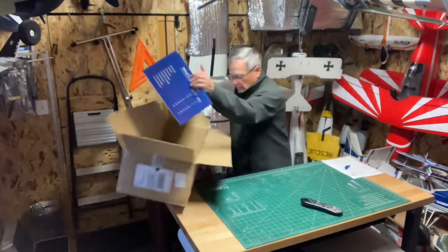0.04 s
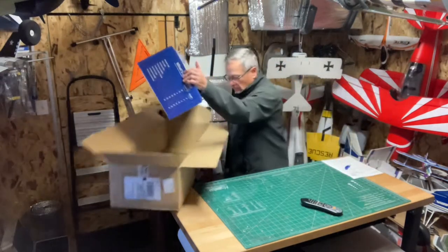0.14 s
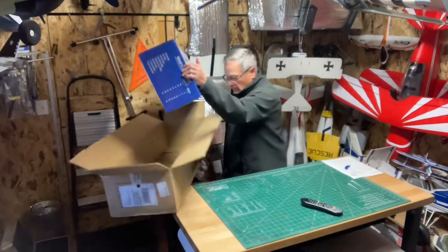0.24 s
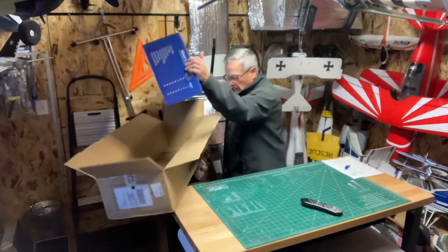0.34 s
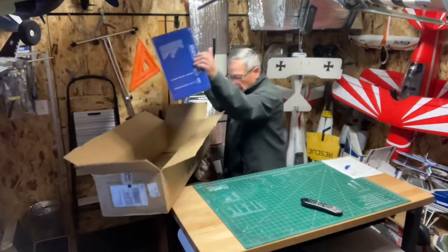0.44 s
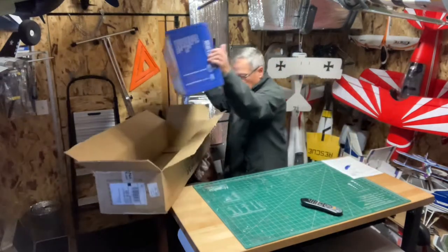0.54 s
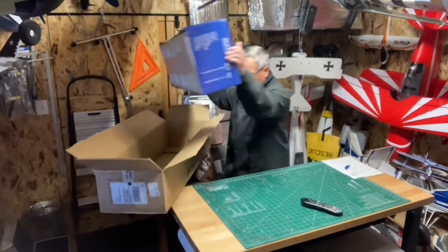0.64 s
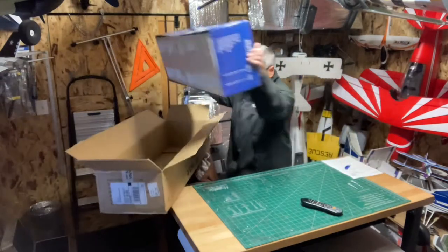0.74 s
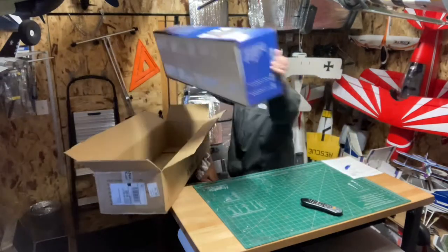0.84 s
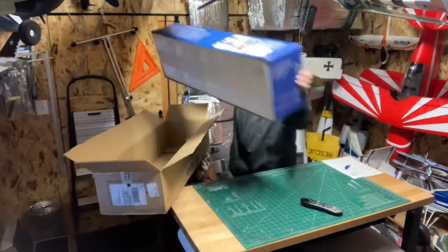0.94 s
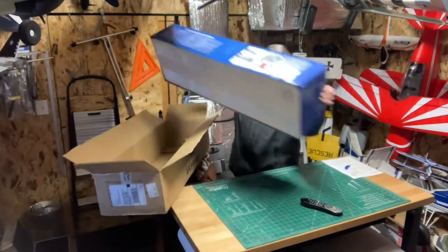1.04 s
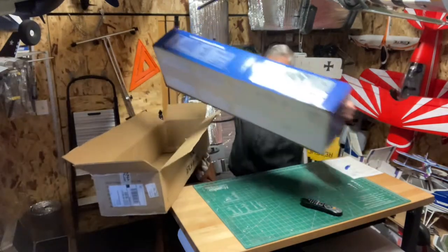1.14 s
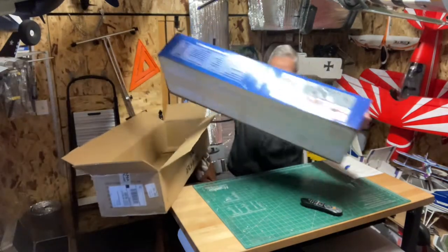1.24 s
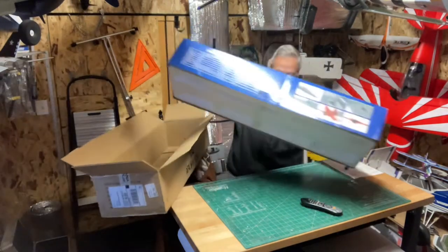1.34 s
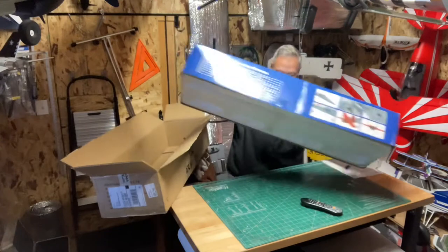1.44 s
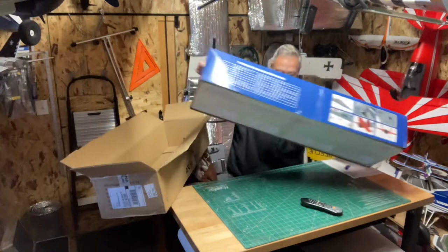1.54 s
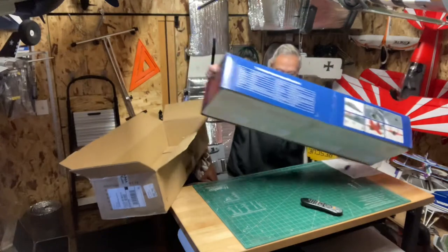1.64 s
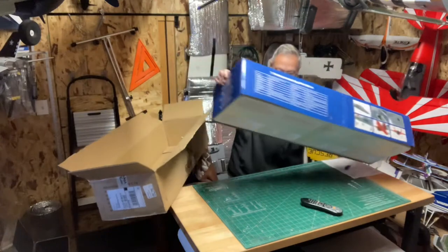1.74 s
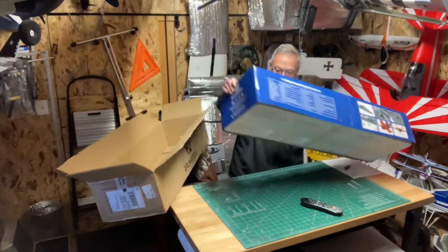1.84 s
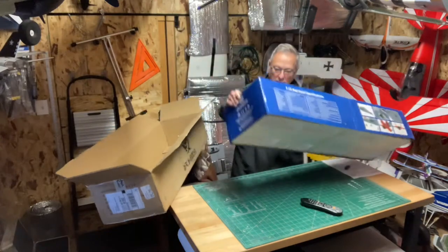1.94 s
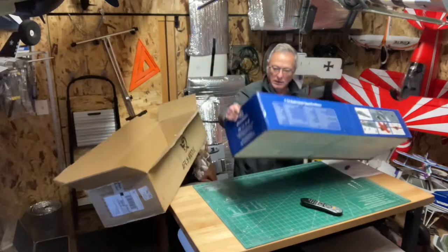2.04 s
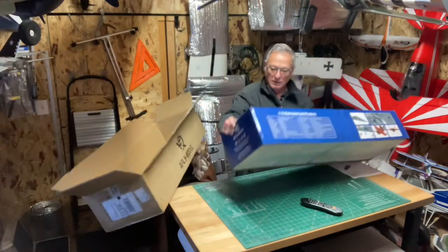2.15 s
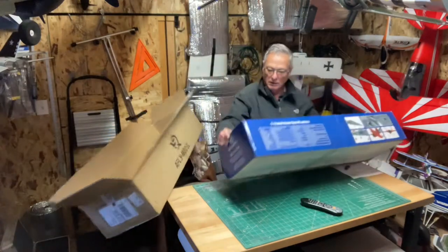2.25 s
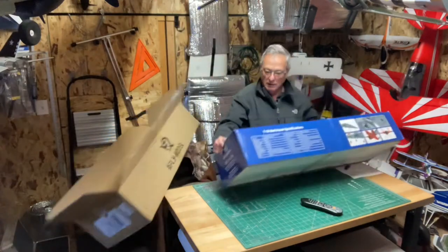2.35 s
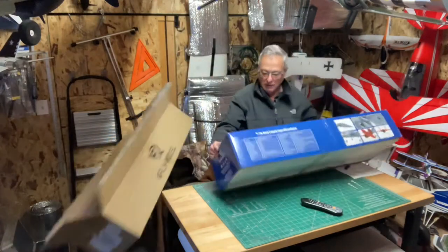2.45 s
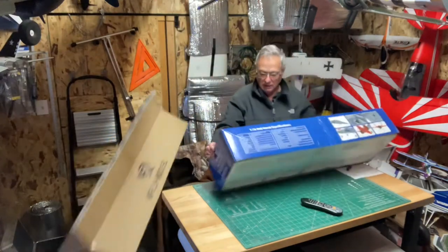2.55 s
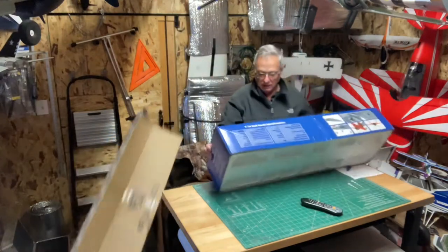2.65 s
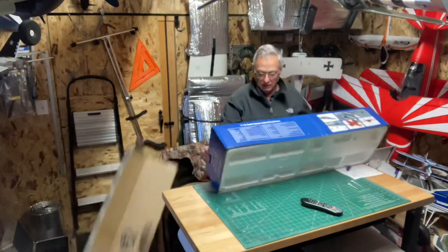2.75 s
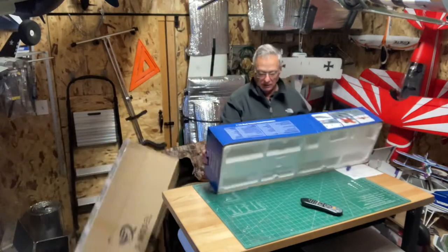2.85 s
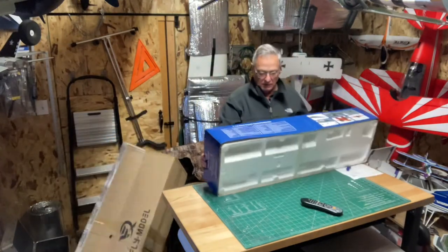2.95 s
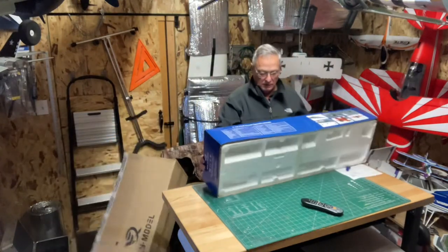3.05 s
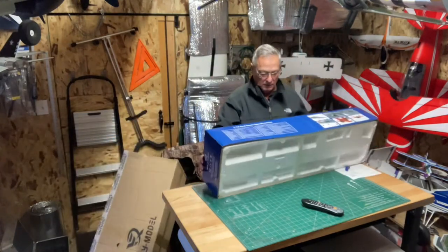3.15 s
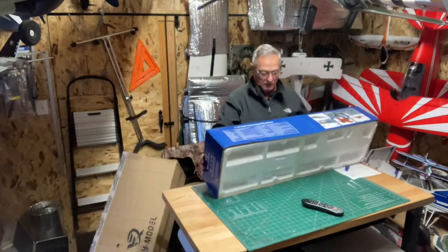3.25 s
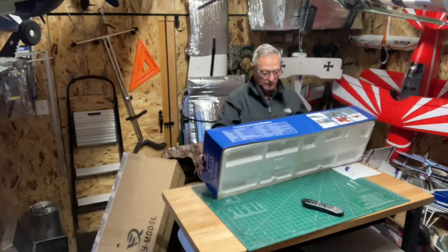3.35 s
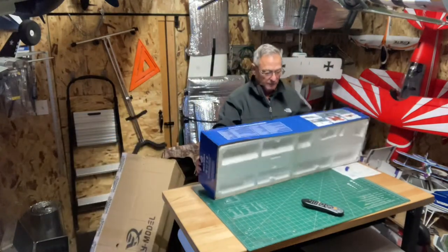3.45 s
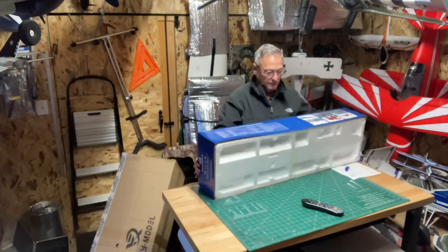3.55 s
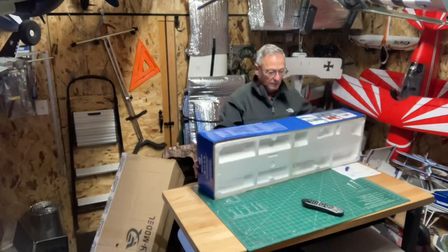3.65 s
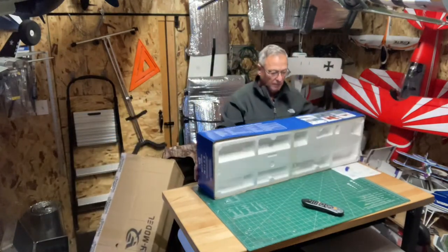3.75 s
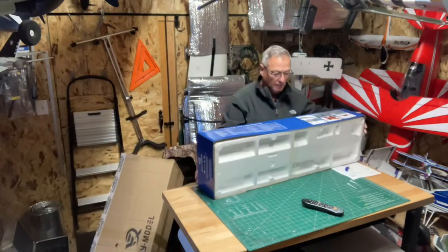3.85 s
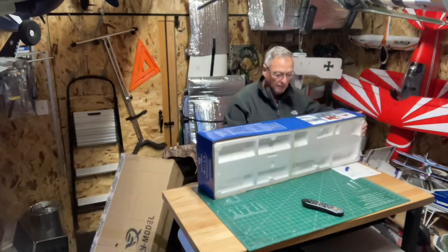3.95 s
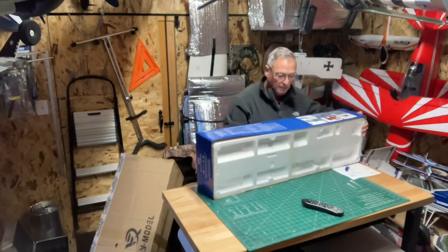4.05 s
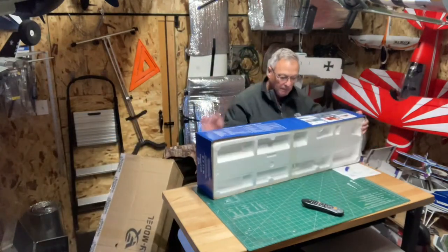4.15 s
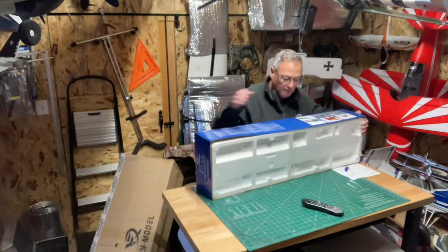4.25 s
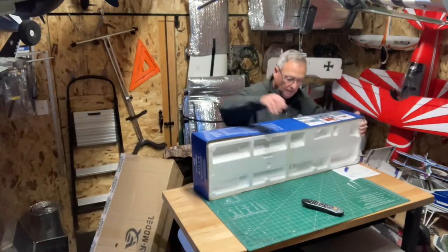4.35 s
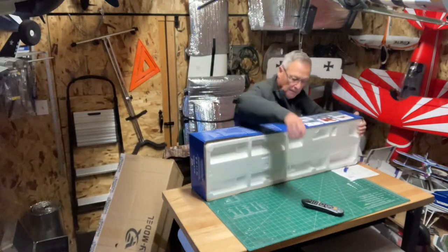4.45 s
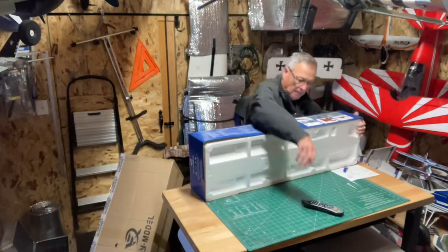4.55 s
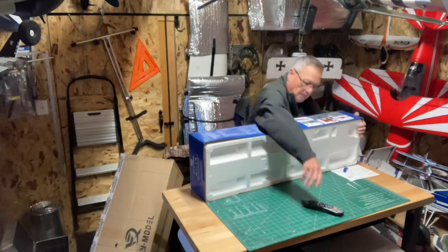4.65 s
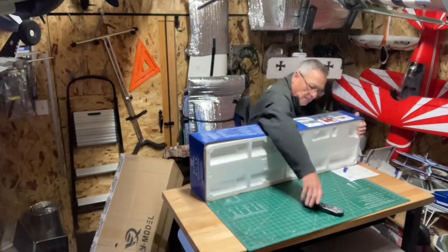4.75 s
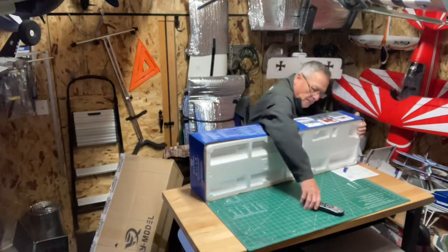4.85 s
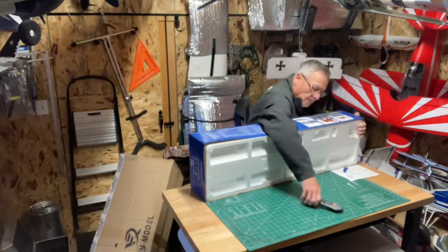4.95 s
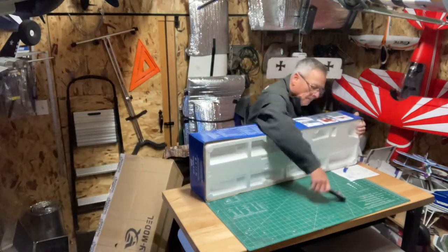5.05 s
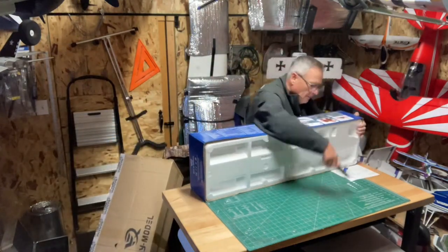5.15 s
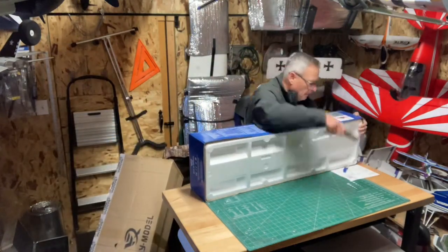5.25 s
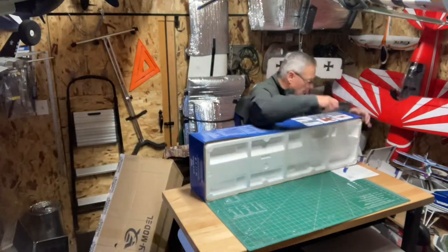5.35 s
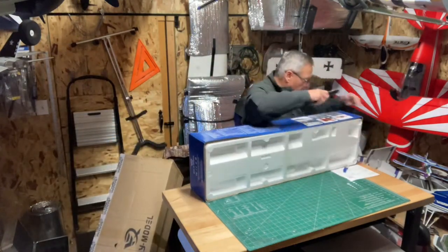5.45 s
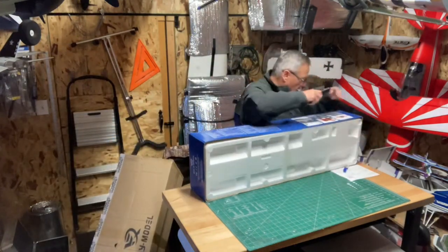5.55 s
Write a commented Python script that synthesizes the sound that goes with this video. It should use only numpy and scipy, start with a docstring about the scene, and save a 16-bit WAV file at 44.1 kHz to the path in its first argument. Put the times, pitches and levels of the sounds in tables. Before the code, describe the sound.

An empty cardboard carton thumps and skids off a bench, then crashes to the floor and bounces, followed by soft box rubbing, knocks and snaps.

```python
"""In a small workshop an empty shipping carton thumps, skids and squeaks off a bench, then tips over and
bounces on the floor, while a long boxed kit is turned in the hands, set down and pushed into place.
Last, a hand reaches over and picks something off the bench. Thumps and knocks are dying tones of bending
walls, skids, rubbing and scuffs are noise made of tiny slips, squeaks are gliding tones, and snaps are
short clicks with a slap. Echoes and low, steady noise fill the room."""
import sys
import numpy as np
from scipy import signal
from scipy.fft import rfft, irfft
from scipy.io import wavfile
from scipy.ndimage import uniform_filter1d

SR = 44100
rng = np.random.default_rng(int(sys.argv[2]) if len(sys.argv) > 2 else 0)


def wav_out(sig):
    """Save sig, one row per channel (or a flat mono array), as 16-bit PCM at SR to the path in sys.argv[1]."""
    wavfile.write(sys.argv[1], SR, np.round(np.clip(np.atleast_2d(sig).T, -1, 1) * 32767).astype(np.int16))


N = 246959
TIME = np.arange(N) / SR

# tone of a rasping or slapping cardboard surface: (frequency [Hz], level [dB])
RASP_COLOUR = [(400, -15), (800, 5.5), (1350, 6), (2400, 1), (4200, -1), (6500, -21.5), (12000, -69)]


def amp(db):
    """Turns decibels into a gain."""
    return 10 ** (np.asarray(db) / 20)


def unit(x):
    """Scales a sound to an rms (average strength) of one."""
    return x / np.sqrt(np.mean(x ** 2) + 1e-20)


def decay(t, t60):
    """Fades by 60 dB in t60 seconds."""
    return np.exp(-np.log(1000) * t / t60)


def ring(hz, t60, t):
    """One dying tone of something that vibrates."""
    return np.sin(2 * np.pi * hz * t) * decay(t, max(t60, 1 / 1000))


def read(points, hz):
    """Reads a table between its points, with pitch on a log scale."""
    f, value = np.transpose(points)
    return np.interp(np.log(hz + 1), np.log(f + 1), value)


def add(mix, s, sound):
    """Mixes a sound in at time s, or at the start if s is negative."""
    part = mix[max(round(s * SR), 0):][:len(sound)]
    part += sound[:len(part)]


def response(points, tilt_db=0, size=4096):
    """Filter with a given spectrum that only rings after its input; the tilt is in dB per octave."""
    hz = abs(np.fft.fftfreq(size, 1 / SR))
    # the tilt turns about 3000 Hz and stays level below 500 Hz
    tilt = tilt_db * np.log2(np.maximum(hz, 500) / 3000)
    log_gain = np.log(amp(read(points, hz) + tilt))
    # the Hilbert transform finds the phase that makes the filter respond soonest
    spectrum = np.exp(np.conj(signal.hilbert(log_gain)))
    return np.fft.ifft(spectrum).real[:size // 2]


def colour(x, points, tilt_db=0):
    """Shapes the tone of a sound, keeping the energy of white noise unchanged."""
    h = response(points, tilt_db)
    return signal.oaconvolve(x, h / np.linalg.norm(h))[:len(x)]


def grains(n, per_s, spread_db, smooth):
    """Paper fibres stick and slip: scattered slips of uneven size over a smooth hiss."""
    size = amp(spread_db * np.minimum(rng.exponential(1, n), 3)) * rng.choice([-1, 1], n)
    slips = unit(size * (rng.random(n) < per_s / SR))
    return unit(slips + smooth * rng.standard_normal(n))


def waver(count):
    """Wanders between -0.1 and 1, heading for a new random value count times a second."""
    knots = np.arange(0, N / SR + 1, 1 / count)
    return np.interp(TIME, knots, rng.uniform(-0.1, 1, len(knots)))


def roam(x, patchy_db, corner_hz=4500):
    """As the contact point travels, different patches of the sheet speak; the finest fibres hiss evenly."""
    hz, _, z = signal.stft(x, SR, nperseg=512, noverlap=384)
    patches = rng.standard_normal(z.shape)
    patches = uniform_filter1d(patches, size=6, axis=0)  # smooth over pitch
    patches = unit(uniform_filter1d(patches, size=11, axis=1))  # smooth over time
    depth = patchy_db / (1 + (hz[:, None] / corner_hz) ** 2)
    return unit(signal.istft(z * amp(depth * patches), nperseg=512, noverlap=384)[1][:len(x)])


def pair(mid, side):
    """Spread-out sound at two close microphones: their likeness changes with pitch."""
    # difference between the two sides against their shared sound: (frequency [Hz], level [dB])
    width = [(60, -9.5), (200, -9.5), (450, -3.5), (800, 0), (1400, -1), (2400, 3), (3800, -8), (6000, 5.5),
             (8500, -17), (10500, 9.5), (13500, -4), (16000, -21)]
    hz = np.fft.rfftfreq(len(side), 1 / SR)
    side = irfft(rfft(side) * amp(read(width, hz)), len(side))
    return np.array([mid + side, mid - side])


def place(x, left_db, lead_s=0):
    """Sound straight from a source is louder and earlier at the nearer microphone."""
    right = np.interp(TIME - lead_s, TIME, x)  # a positive lead makes the right side later
    return np.array([x * amp(left_db / 2), right * amp(-left_db / 2)])


def air(level_db=-66):
    """Low, steady noise of the still air in the workshop, made of coloured noise."""
    # tone of the still air: (frequency [Hz], level [dB])
    air_colour = [(20, -12), (35, -4), (60, 10), (95, -0.5), (200, -17.5), (480, -23.5), (700, -19.5),
                  (1500, -23), (3000, -30), (6500, -33.5), (9000, -33.5), (16000, -48)]
    mid, side = (colour(rng.standard_normal(N), air_colour) for _ in range(2))
    return amp(level_db) * pair(mid, side)


def thumps():
    """A landing bends a wall, which pumps the hollow modes; a slacker wall wakes more of the deep boom."""
    # landings and shoves:
    # (time [s], level [dB], pitch of the bending wall [Hz], its t60 [s], hollow modes [dB])
    landings = [(0.0, -19.5, 88.5, 0.11, -18), (.027, -19.5, 79, 0.14, -21), (.172, -23.5, 100, 0.069, -14),
                (1.721, -55.5, 210, 0.098, 1), (2.409, -22, 84, 0.11, -10.5),
                (2.475, -32.5, 64.5, 0.21, -16), (2.561, -33.5, 73, 0.21, -8.5),
                (2.745, -7, 83.7, .21, -8.5), (2.9498, -13.5, 69.1, 0.13, -12),
                (3.027, -26.5, 62.2, 0.31, -18), (3.078, -27, 69, 0.22, -11.5),
                (3.298, -34.5, 74, 0.22, -10), (3.405, -34.5, 68.3, 0.24, -7),
                (3.51, -36.5, 81, 0.15, -6.5), (3.65, -43, 77, 0.11, -2), (3.795, -43.5, 158, 0.17, -8.5),
                (4.49, -52, 60.4, 0.31, -25), (4.794, -33.5, 114, 0.23, -15), (4.819, -35, 168, 0.11, -23),
                (4.866, -43, 101, 0.14, -16), (4.992, -48, 103, 0.098, -1.5),
                (5.23, -46.5, 78.3, 0.28, -13)]
    # hollow modes of carton and bench: (frequency [Hz], level [dB], t60 [s])
    hollow_modes = [(126, 4.5, 0.08), (178.3, -2, 0.2), (202.2, -3, 0.26), (309.8, -5.5, 0.14),
                    (387.8, -6.5, 0.27), (409.3, -13, 0.12), (435.7, -27.5, 0.53), (505, 1, 0.046)]
    boom_hz, boom_t60 = 55.87, 0.55  # the deepest resonance of the shop [Hz, s]
    boom_db_per_octave = -18  # the boom is as strong as a wall tuned to it, and weaker for stiffer walls
    swell_s = 0.0049  # time a wall takes to bend
    out, t = np.zeros(N), np.arange(SR) / SR
    hollow = sum(amp(db) * ring(hz, t60, t) for hz, db, t60 in hollow_modes)
    boom = ring(boom_hz, boom_t60, t)
    for s, db, hz, t60, hollow_db in landings:
        boom_db = boom_db_per_octave * np.log2(hz / boom_hz)
        body = ring(hz, t60, t) + amp(boom_db) * boom + amp(hollow_db) * hollow
        add(out, s, amp(db) * body * (1 - np.exp(-t / swell_s)))
    return out


def skid(rings_db=-3, chatter_db=3, wander_db=6):
    """The carton's bottom chatters in many small slips; the resonances of its flaps come and go."""
    # the carton skidding over the bench edge: (time [s], level [dB])
    skid_level = [(0.0, -42.5), (0.076, -41), (0.118, -44), (0.158, -42), (0.25, -58.5), (0.322, -57),
                  (0.35, -65.5), (0.422, -69.5)]
    # tone of the slips: (frequency [Hz], level [dB])
    skid_colour = [(150, -21.5), (380, -1), (650, -17.5), (1130, -7.5), (1600, -13.5), (2900, -13),
                   (4100, -14.5), (6200, -18), (9000, -15), (15000, -40.5)]
    # flap resonances, before their wander: (frequency [Hz], width [Hz], level [dB])
    flap_rings = [(1115, 140, 1), (1780, 450, 2.5), (2380, 50, -31), (3400, 190, -1), (3850, 260, -2),
                  (4300, 540, 8)]
    slips = grains(N, per_s=1300, spread_db=3, smooth=0.4)
    slips = roam(slips, patchy_db=1.5) * amp(chatter_db * waver(count=110))
    rings = np.zeros(N)
    for hz, width_hz, db in flap_rings:
        tone = unit(signal.lfilter(*signal.iirpeak(hz, hz / width_hz, SR), slips))
        rings += amp(db + wander_db * waver(count=35)) * tone
    s, db = np.transpose(skid_level)
    level = amp(np.interp(TIME, s, db, right=-120))
    return level * (unit(colour(slips, skid_colour)) + amp(rings_db) * unit(rings))


def squeaks(jitter=0.0542):
    """Slips fall into step for an instant and make a rough, gliding tone."""
    # squeaks of dragged cardboard:
    # (time of the peak [s], level [dB], half length [s], pitch [Hz], glide [octaves per second])
    squeak_table = [(0.013, -37, 0.042, 4130, 0), (0.044, -39, 0.021, 3656, -14),
                    (0.071, -41, 0.024, 2074, -19), (0.084, -44, 0.012, 1200, -7),
                    (0.141, -40, 0.011, 1148, -1), (0.156, -38, 0.011, 3850, 2),
                    (1.044, -49.5, .003, 1770, -15), (2.576, -36, .004, 1113, -0.5)]
    out = np.zeros(N)
    for s, db, half, hz, glide in squeak_table:
        t = np.arange(-3 * half, 3 * half, 1 / SR)
        t = t[t > -s]  # leave out what falls before the start
        unsteady = unit(uniform_filter1d(rng.standard_normal(SR // 4), size=50))[:len(t)]
        pitch = hz * 2 ** (glide * t) * (1 + jitter * unsteady)
        phase = 2 * np.pi * np.cumsum(pitch) / SR
        tone = unit(np.sin(phase) + 0.14 * np.sin(2 * phase))
        add(out, s + t[0], amp(db) * np.exp(-(t / half) ** 2) * tone)
    return out


def knocks(level_db=2, focus_db=6):
    """A blow dents the wall, wakes modes near its own pitch, jars the board and claps on the surface."""
    # knocks on a box wall, before the shared lift and the shifts between sides:
    # (time [s], level [dB], centre of the blow [Hz], side [no unit, positive is left])
    blows = [(0.148, -36.5, 406, -0.036), (1.055, -26.5, 488, -0.77), (1.0565, -37, 795, -1.2),
             (1.712, -42, 443, 0.068), (2.2487, -39, 410, -0.81), (2.388, -27.5, 400, -0.65),
             (2.401, -38, 790, 0.14), (2.454, -32, 325, -1.2), (2.743, -28.5, 384, -0.89),
             (2.949, -25.5, 425, -.5), (3.078, -26, 370, 1), (3.241, -43.5, 436, -0.32),
             (3.391, -56, 460, -0.11), (3.522, -40.5, 435, -0.7), (3.613, -38.5, 400, 0.038),
             (3.658, -33, 443, -1.25), (3.773, -42.5, 333, 0.44), (3.988, -47, 258, -0.98),
             (4.412, -36.5, 1310, -0.31), (4.567, -42.5, 960, -0.31), (4.974, -41, 920, -1),
             (5.234, -45, 358, -0.46)]
    # modes of a box wall, before random detuning: (frequency [Hz], level [dB], t60 [s])
    wall_modes = [(280.4, -3.5, 0.055), (333, -4, 0.074), (400, -10, 0.052), (442, 6.5, 0.032),
                  (530, -4.5, 0.075), (646, -19.5, 0.014), (824, -2, 0.035), (986, -20.5, 0.11),
                  (1103, 4, 0.019), (1398, 1.5, 0.062), (1525, 8, 0.013)]
    # crowded modes of corrugated board: (frequency [Hz], level [dB])
    ply_colour = [(130, -27.5), (220, -18), (340, 5), (500, 3), (640, -1.5), (820, 15.5), (1050, -17),
                  (1600, -14), (2500, -23), (5000, -33)]
    contact_s = 0.0013  # softens the start of the blow
    dent, dent_t60 = 3.1, 0.03  # strength [gain], fade [s]
    ply_db, ply_t60 = -14, 0.064
    clap_db, clap_t60 = -17, 0.022
    side_db, side_s = 3.0, 0.00031  # difference between the channels for a side of one
    out, t = np.zeros((2, N)), np.arange(SR // 3) / SR
    attack = 1 - np.exp(-t / contact_s)
    for s, db, hz, side in blows:
        modes = np.zeros(len(t))
        for k, (f, mode_db, t60) in enumerate(wall_modes):
            # modes further from the centre of the blow are weaker; neighbours start in opposite directions
            gain = amp(mode_db - focus_db * abs(np.log2(f / hz))) * (-1) ** k
            modes += gain * ring(f * rng.uniform(0.87, 1.071), t60, t)
        blow = (modes + dent * ring(hz, dent_t60, t)) * attack
        ply = unit(colour(rng.standard_normal(len(t)), ply_colour)) * attack * decay(t, ply_t60)
        clap = unit(colour(rng.standard_normal(len(t)), RASP_COLOUR)) * attack * decay(t, clap_t60)
        blow = blow / abs(blow).max() + amp(ply_db) * ply + amp(clap_db) * clap
        for channel, near in zip(out, (side / 2, -side / 2)):
            add(channel, s - near * side_s, amp(db + level_db + near * side_db) * blow)
    return out


def rubbing(grip_db=1.0, hiss_growth=1.29):
    """Strokes speed up and slow down; their slips drum on the wall, rasp on its surface and hiss in fibres."""
    # hands, sleeves and cardboard over cardboard, drumming and hiss against the rasp:
    # (time of greatest speed [s], level [dB], speeding up [s], slowing down [s], drumming [dB], hiss [dB])
    strokes = [(0.298, -59.5, .035, 0.022, 5, 12.5), (0.572, -67, 0.36, 0.061, 7.5, -13.5),
               (.73, -63.5, 0.16, 0.14, -8, -16), (1.121, -66, 0.1, 0.057, 8, -9),
               (1.54, -72.5, 0.14, 0.093, 6, -21), (1.85, -69, 0.26, 0.2, -5.5, -5),
               (2.39, -54.5, 0.16, 0.26, 2, -7), (2.64, -53, 0.28, 0.13, 2, -3.5),
               (2.86, -46, 0.06, 0.2, 0, -5.5), (3.02, -48, 0.017, 0.11, 0.5, 0.5),
               (3.2, -56.5, 0.015, 0.04, -12, 2.5), (3.381, -48.5, 0.1, 0.044, 1, -7),
               (3.52, -54, 0.063, 0.043, 3.5, -3), (3.628, -52.5, 0.04, .14, -4, -5.5),
               (4.0, -58, 0.15, 0.047, -0.5, -5), (4.101, -63, 0.1, 0.057, -25, 8.5),
               (4.22, -55.5, 0.072, 0.11, -2.5, -5), (4.35, -52, 0.11, 0.13, -2.5, -8),
               (4.61, -52.5, 0.056, 0.16, -4, -6.5), (4.839, -52.5, 0.059, 0.035, -9, -2),
               (4.949, -56, 0.087, 0.058, -5.5, 3), (5.221, -53.5, 0.2, 0.068, -3.5, -3),
               (5.421, -63, 0.14, 0.031, -9, -1.5)]
    # tone of the drumming wall: (frequency [Hz], level [dB])
    drum_colour = [(30, -24), (55, -0.5), (90, -13), (150, -10.5), (260, -6.5), (350, -1), (470, 2.5),
                   (660, -8), (900, -10.5), (1600, -56.5)]
    # tone of the hissing fibres: (frequency [Hz], level [dB])
    hiss_colour = [(2000, -37), (5000, 12.5), (7000, 7.5), (9200, 11.5), (13000, -0.5), (16000, -3.5)]
    stroke_shape = 1.34  # 1 = a pointed peak of speed, 2 = a round bell
    power = np.zeros((3, N))
    for s, db, rise, fall, wall_db, fibre_db in strokes:
        from_peak = np.maximum((s - TIME) / rise, (TIME - s) / fall)
        speed = np.exp(-np.minimum(from_peak, 10) ** stroke_shape)
        levels = np.array([amp(wall_db) * speed, speed, amp(fibre_db) * speed ** hiss_growth])
        power += (amp(db) * levels) ** 2
    slips = grains(N, per_s=800, spread_db=4, smooth=0.6)
    slips = roam(slips, patchy_db=3.5) * amp(grip_db * waver(count=90))
    colours = [drum_colour, RASP_COLOUR, hiss_colour]
    parts = [level * unit(colour(slips, shape)) for level, shape in zip(np.sqrt(power), colours)]
    return amp(-1) * sum(parts)


def snaps(splinter=0.78, crack_s=0.00023, slap_s=0.0025):
    """A crease gives way with a crack and its flap slaps; returns the cracks and the slaps."""
    # snapping creases and edges, before the mix: (time [s], level of the crack [dB], slap against it [dB])
    snap_table = [(.6615, -47.5, 15), (.774, -29, 5.5), (0.7967, -34, -16), (1.712, -43, 7),
                  (2.414, -32, 7), (2.544, -25, 2.5), (2.847, -21, -17), (2.863, -21, 4.5),
                  (3.031, -15, -29), (3.168, -35.5, 1.5), (3.395, -23.5, -0.5), (3.4428, -30, -1),
                  (3.521, -33.5, 5), (3.744, -32, -22), (3.824, -30, 2), (3.923, -29.5, -9),
                  (4.566, -44, 6), (4.7314, -29, -0.5), (4.986, -33, -25), (5.058, -30, -6),
                  (5.315, -25.5, -10)]
    # tone of a crack: (frequency [Hz], level [dB])
    crack_colour = [(500, -17), (2000, -10.5), (5000, -7), (7000, -8), (9200, 0), (13000, -10.5),
                    (16000, -26)]
    cracks, flaps, t = np.zeros(N), np.zeros(N), np.arange(2048) / SR
    fades = np.exp(-t / np.array([[crack_s], [slap_s]]))
    for s, db, flap_db in snap_table:
        fibres, slap = rng.standard_normal((2, len(t))) * fades
        # one sharp click, then splintering fibres
        crack = (t == 0) + splinter * (t > 0) * fibres / np.linalg.norm(fibres)
        add(cracks, s, amp(db) * colour(crack, crack_colour))
        add(flaps, s, amp(db + flap_db) * colour(slap / np.linalg.norm(slap), RASP_COLOUR))
    return cracks, flaps


def scuffs():
    """An edge bites, drags for a moment and lets go: a short burst of slips."""
    # short scuffs of an edge: (time [s], level [dB], rise [s], t60 [s], treble tilt [dB per octave])
    scuff_table = [(0.773, -45, 0.00094, .14, 0), (1.044, -40, 0.005, 0.02, -1),
                   (1.16, -56, 0.016, 0.05, -6), (1.343, -63.5, 0.0043, 0.05, -4),
                   (1.574, -61.5, 0.0066, 0.13, -2.5), (2.386, -36, 0.0015, 0.23, -7),
                   (2.545, -32, 0.025, 0.092, 0), (2.731, -32, 0.0027, 0.36, -1),
                   (2.859, -34, 0.0057, 0.04, -1), (2.946, -39.5, .004, 0.11, 2),
                   (3.068, -42.5, 0.0015, 0.16, -1.5), (3.923, -44.5, 0.002, 0.043, -2),
                   (4.31, -49.5, 0.0035, 0.058, -2.5), (4.412, -44, 0.001, .06, -5.5),
                   (4.971, -43, 0.014, 0.041, 5), (5.197, -49, 0.0053, 0.18, -2),
                   (5.554, -66.5, 0.0022, .04, -1)]
    # tone of a scuff before its tilt: (frequency [Hz], level [dB])
    scuff_colour = [(150, -20), (450, -8), (700, -8.5), (1400, -4), (2600, -8), (4200, -6.5), (6500, -11.5),
                    (9000, -8.5), (15000, -24.5)]
    out, t = np.zeros(N), np.arange(SR // 3) / SR
    for s, db, rise, t60, tilt_db in scuff_table:
        stroke = np.minimum(t / rise, 1) ** 2 * decay(np.maximum(t - rise, 0), t60)
        slips = stroke * grains(len(t), per_s=2500, spread_db=2.5, smooth=0.28)
        add(out, s, amp(db) * colour(slips, scuff_colour, tilt_db))
    return out


def reflections(first_s=0.001976):
    """Dense echoes from bench, shelves and walls, each band of pitch dying at its own speed."""
    # how long the room rings: (frequency [Hz], t60 [s])
    room_t60 = [(100, 0.48), (500, 0.19), (1400, 0.12), (4000, 0.14), (10000, 0.11), (16000, 0.2)]
    taps = rng.standard_normal((2, SR // 2)) * (rng.random((2, SR // 2)) < 9000 / SR)  # 9000 a second
    hz, t, z = signal.stft(taps, SR, nperseg=256)
    fading = z * decay(t, read(room_t60, hz)[:, None])
    tails = signal.istft(fading, SR, nperseg=256)[1]
    tails = tails * (np.arange(tails.shape[1]) / SR > first_s)
    return pair(*tails) / np.linalg.norm(tails[0])


def room(x, count=4, drift_s=0.25):
    """Random patterns of dense echoes trade shares of the sound at a steady pace, so no pitch rings on."""
    shares = []
    for k in range(count):
        turn = TIME / drift_s * (1 + k / count) + k / count
        shares.append(np.sqrt(2 / count) * np.cos(np.pi * turn))
    total = np.sqrt(np.sum(np.square(shares), axis=0) + 1e-9)  # keeps the summed power steady
    return sum(signal.oaconvolve((x * share / total)[None], reflections(), axes=1)[:, :N]
               for share in shares)


def scene():
    """Thumps lean left and rubbing leans right; near walls return the knocks and the room answers all."""
    # slaps off the nearest walls: (delay [s], level [dB])
    near_walls = [(0.0121, -13.5), (.023, -24)]
    heavy, knock = thumps(), knocks()
    friction = skid() + squeaks() + rubbing() + scuffs()
    cracks, flaps = snaps()
    snap = amp(4) * cracks + amp(-5) * flaps
    direct = place(heavy, left_db=2.5, lead_s=0.00056) + knock
    direct += place(snap, left_db=-0.5, lead_s=-0.000024)
    direct += amp(-1.0) * place(friction, left_db=-2.5, lead_s=-0.000094)
    knock_mid = knock.mean(0)
    slaps = sum(amp(db) * np.interp(TIME - delay, TIME, knock_mid, left=0) for delay, db in near_walls)
    # how strongly each source feeds the room
    radiated = amp(-14) * heavy + amp(-3.5) * knock_mid
    radiated += amp(4.5) * cracks + amp(4.5) * flaps + amp(-0.74) * friction
    return direct + slaps + room(radiated) + air()


def record(dry):
    """The microphone ports notch the treble; then a filter removes the highest pitches."""
    # tone of the microphone: (frequency [Hz], level [dB])
    microphone = [(20, -27), (32, -12), (48, -1.5), (4800, -2.5), (6400, -4.5), (8400, 1), (10300, -1),
                  (11000, -13.5), (11400, -26.5), (12200, 3.5), (13500, 5), (15000, 7), (16000, -16.5)]
    edge_hz = 16400
    coloured = signal.oaconvolve(dry, response(microphone)[None], axes=1)[:, :N]
    low_pass = signal.firwin(511, edge_hz, window=("kaiser", 9), fs=SR)
    return signal.oaconvolve(coloured, low_pass[None], "same")


dry = scene()
out = record(dry)
wav_out(out)
```